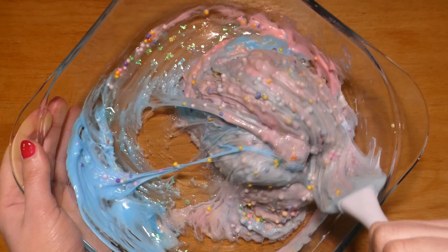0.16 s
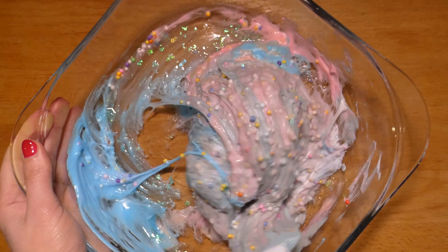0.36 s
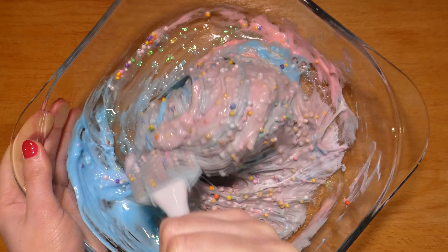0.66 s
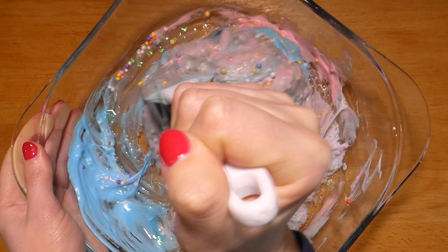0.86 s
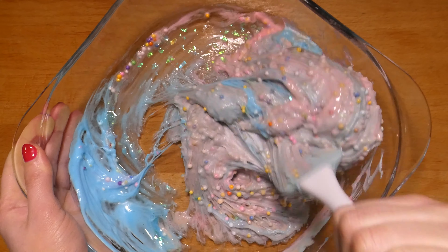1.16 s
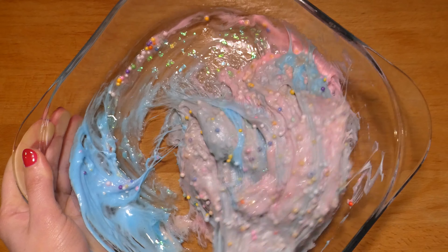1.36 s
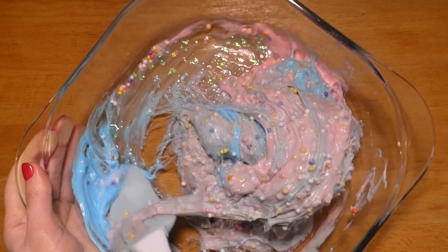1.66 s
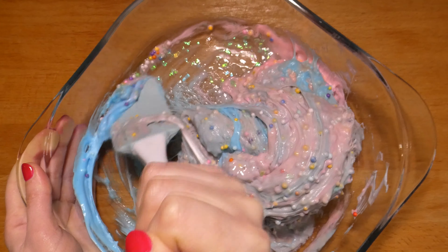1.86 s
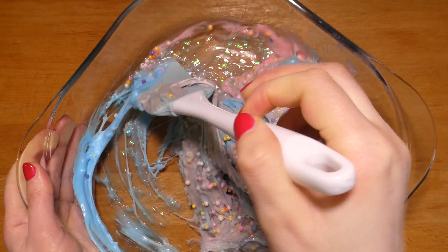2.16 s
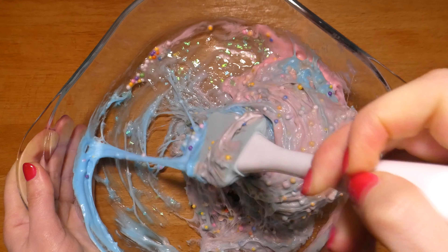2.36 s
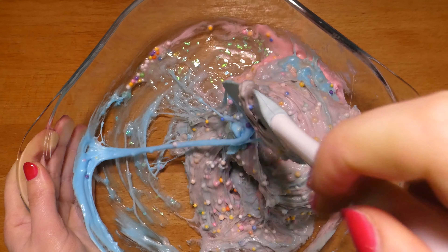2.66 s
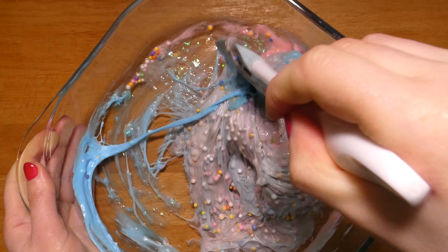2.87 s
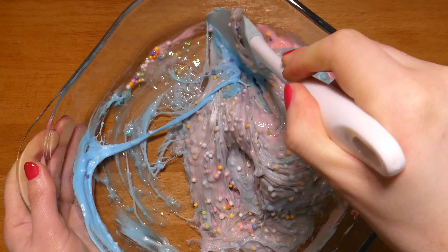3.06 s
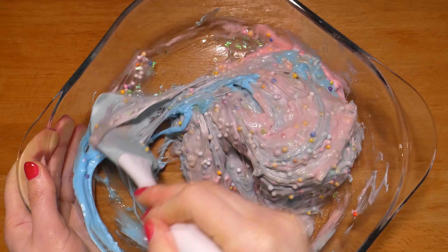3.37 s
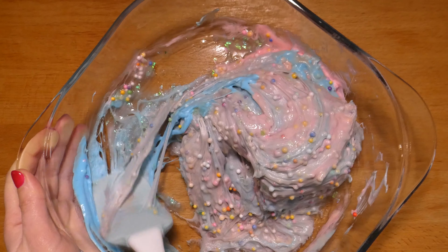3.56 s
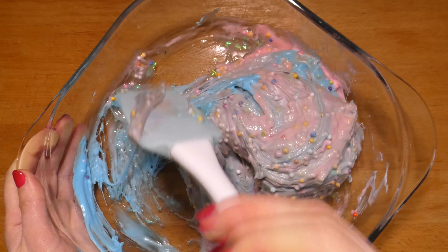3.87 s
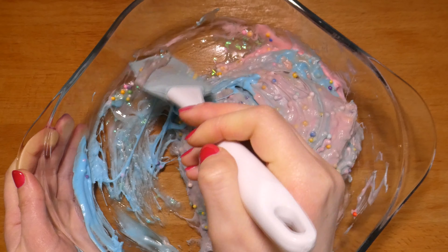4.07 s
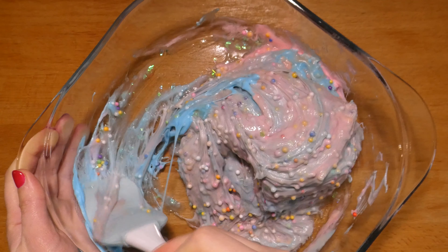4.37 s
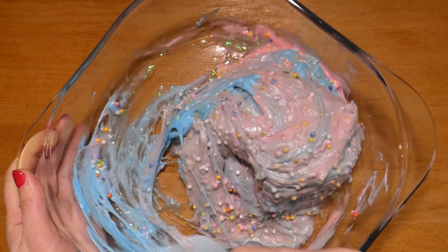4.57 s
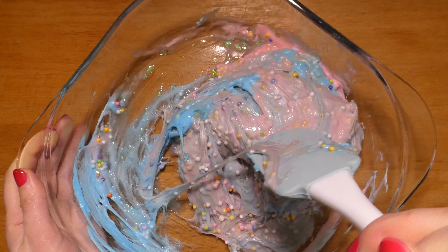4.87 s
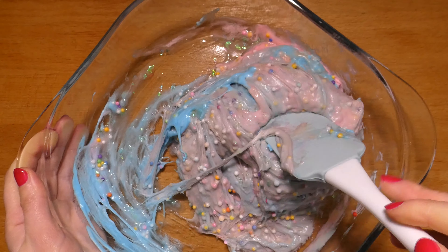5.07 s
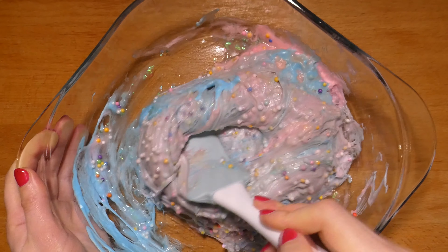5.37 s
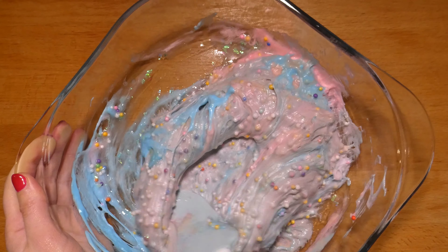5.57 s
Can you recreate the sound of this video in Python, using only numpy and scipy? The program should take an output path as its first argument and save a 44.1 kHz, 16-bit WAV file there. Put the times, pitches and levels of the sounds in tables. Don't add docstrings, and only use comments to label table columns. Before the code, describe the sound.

Sticky wet slime stirred in a glass bowl, with sharp ticks, small bubble pops and squelches, and one loud snapping pop past four seconds.

```python
import sys
import numpy as np
from scipy import signal
from scipy.fft import rfft, irfft, next_fast_len
from scipy.io import wavfile
from scipy.ndimage import uniform_filter1d, map_coordinates

SR = 44100
rng = np.random.default_rng(int(sys.argv[2]) if len(sys.argv) > 2 else 0)


def master(y):
    cut = np.clip(np.atleast_2d(y).T, -1, 1)
    pcm = np.round(cut * 32767)
    wavfile.write(sys.argv[1], SR, pcm.astype(np.int16))


def how_loud(loudness_db):
    steps = np.asarray(loudness_db, float) / 20
    return 10 ** steps


N = 252252

# t/s, peak level/dB
BIG_POCKET = (4.31744, -2.9)


def unit(x):
    return x / np.sqrt(np.mean(x ** 2) + 1e-20)


def along(points, hz):
    f, v = np.transpose(points)
    return np.interp(np.log(hz + 1), np.log(f + 1), v)


def filtered(x, response):
    m = next_fast_len(N + SR // 2)
    return irfft(rfft(x, m) * response(np.fft.rfftfreq(m, 1 / SR)), m)[..., :N]


def wobble(knots_per_s):
    knots = rng.standard_normal(int(N * knots_per_s / SR) + 4)
    return map_coordinates(knots, [np.arange(N) * knots_per_s / SR])


def rush(spectrum, patchy_db):
    z = signal.stft(rng.standard_normal(N), nperseg=256)[2]
    field = uniform_filter1d(rng.standard_normal(z.shape), 8, 0)
    field = uniform_filter1d(field, 5, 1)
    x = signal.istft(z * how_loud(patchy_db * unit(field)), nperseg=256)[1][:N]
    return unit(filtered(x, lambda hz: how_loud(along(spectrum, hz))))


def lay(s, rows):
    at = np.round(s * SR).astype(int)[:, None] + np.arange(rows.shape[1])
    return np.bincount(at.ravel(), rows.ravel(), N + rows.shape[1] + SR)[:N]


def grains(s, db, hz, cycles, size, rise=0.51):
    turns = hz[:, None] * np.arange(size) / SR
    decay = np.exp(-2 * turns / np.clip(cycles, .3, 30)[:, None])
    swell = (1 - np.exp(-(turns / rise) ** 2)) * decay
    return lay(s, how_loud(db)[:, None] * np.sin(2 * np.pi * turns) * swell / swell.max(axis=1, keepdims=True))


def ports(mid, side):
    return np.array([mid + side, mid - side])


def hum():
    # f/Hz, level/dB
    mid_spectrum = [(12, -62), (20, -18), (99, -13.5), (179, -4.5), (361, -2.5), (521, -7.5), (1390, -11.5),
                    (1560, -18), (1900, -9), (2660, -19.5), (10200, -18), (15200, -22.5), (16500, -43)]
    side_spectrum = [(12, -61), (20, -31), (53, -62), (79, -11.5), (237, 1.5), (372, 2), (428, 1),
                     (616, -2), (670, -4), (772, -3), (3140, -20), (14300, -35.5), (16500, -40)]
    return ports(how_loud(-64.0) * rush(mid_spectrum, patchy_db=1.6),
                 how_loud(-52.5) * rush(side_spectrum, patchy_db=-3.5))


def drag():
    # t at full drag/s, hold/s, drag/dB, dryness/dB, depth/dB
    strokes = [(0, 0.083, -55.5, -9, 3), (0.128, 0.14, -54, 2.5, -5.5), (0.323, 0.8, -60, 2, 3),
               (0.673, 0.1, -49.5, -2.5, -5), (0.884, 0.044, -52.5, -1, -2), (0.974, 0.15, -58.5, -3, -0.5),
               (1.125, 0.088, -60.5, -2, 5.5), (1.386, 0.01, -43.5, -1, -0.5), (1.45, 0.01, -62, -6, -6),
               (1.548, 0.055, -49, 1.5, -9), (1.662, 0.063, -51, -5, 1), (1.76, 0.26, -57, -2, -3.5),
               (2.45, 0.15, -67.5, -5, 7.5), (3.228, 0.12, -58, 3.5, -6), (3.595, 0.11, -60, 4.5, -17),
               (4.03, 0.15, -85.5, -17, 22), (4.162, 0.019, -58, -0.5, -15),
               (4.516, 0.085, -49.5, 3.5, -8.5), (4.684, 0.034, -56, -4, -3.5),
               (4.834, 0.94, -77.5, 5, 14.5), (5.245, 0.016, -65, -1, 3), (5.682, .05, -51.5, 1, 2)]
    # t/s, hold/s, drag/dB, dryness/dB, depth/dB
    slumps = [
        (2.772, 0.017, -59.5, -19, 7.5),
        (2.921, 0.026, -56.5, -2, -0.5),
        (3.355, 0.024, -45, -2.5, -5),
        (4.314, 0.035, -38, -5.5, -14),
        (1.404, 0.011, -36.5, -1, -2.5),
        (5.256, 0.29, -60, 7.5, 2),
    ]
    creep_db = [-70.5, -67.5, -67.5]
    stroke_bite_db_per_s, slump_bite_db_per_s = 170, 3000
    ease_db_per_s, tire_db_per_s = 166, 8.5

    s, hold, db, dry_db, deep_db = np.transpose(strokes + slumps)[..., None]
    bite = np.repeat([stroke_bite_db_per_s, slump_bite_db_per_s], [len(strokes), len(slumps)])[:, None]
    t = np.arange(0, N + 64, 64) / SR
    shape_db = db - bite * np.maximum(s - t, 0)
    shape_db -= ease_db_per_s * np.maximum(t - s - np.abs(hold), 0)
    shape_db -= tire_db_per_s * np.maximum(t - s, 0)
    levels = []
    for over_db, floor_db in zip([deep_db, 0, dry_db], creep_db):
        power = how_loud(2 * (shape_db + over_db)).sum(axis=0) + how_loud(2 * floor_db)
        levels.append(np.interp(np.arange(N) / SR, t, 10 * np.log10(power)))
    return levels


def crackle(level_db, count, pitch_hz, spread, cycles, scatter_db):
    s, r = rng.uniform(0, N / SR, count), rng.standard_normal(count)
    db = scatter_db * np.minimum(rng.exponential(1, count), 3.5)
    hz = np.clip(pitch_hz * np.exp(spread * r), 300, 15000)
    return how_loud(level_db) * unit(grains(s, db, hz, np.full(count, cycles), size=96))


def stirring():
    # f/Hz, density/dB
    squelch_spectrum = [(59, -62), (100, -33), (227, -5), (382, -9.5), (416, -4), (610, -12), (1200, -13.5),
                        (1560, -44), (2640, -120)]
    smear_spectrum = [(350, -50), (600, -6.5), (656, -10.5), (1170, -7), (1690, -2), (2040, -5),
                      (2310, -3.5), (2590, -6.5), (5000, -9.5), (6500, -11.5), (11000, -120)]
    tear_spectrum = [(1650, -53), (2800, 12.5), (3450, 0.5), (3970, -21), (4310, 6.5), (9810, 14.5),
                     (12800, 9), (14900, 10.5), (16000, -9), (16500, -54)]
    low_db, mid_db, high_db = drag()
    slip = .6 * wobble(30) + .6 * wobble(90) + .7 * wobble(260)
    body = how_loud(low_db - 2.5 + 0.7 * slip) * rush(squelch_spectrum, patchy_db=2.0)
    smear = how_loud(mid_db - 1.5 + 2.3 * slip) * rush(smear_spectrum, patchy_db=1.5)
    tear = how_loud(high_db - 2.5 + 2.3 * slip) * rush(tear_spectrum, patchy_db=1.5)
    wet = crackle(mid_db - 20.0, count=900, pitch_hz=1780, spread=1.0, cycles=2.4, scatter_db=0.0)
    fizz = crackle(high_db - 6, count=4000, pitch_hz=8000, spread=.4, cycles=2.2, scatter_db=3.1)
    return body + smear + tear + wet + fizz


def ticks():
    # t/s, peak level/dB
    film_rows = [(.2697, -30), (.3245, -29), (.3598, -34), (.389, -36), (.4104, -36), (.9043, -21.5),
                 (.9194, -29), (1.0146, -31.5), (1.2802, -27.5), (1.299, -21.5), (1.4222, -19),
                 (1.494, -25), (1.8823, -35), (1.9034, -36), (3.1766, -21.5), (3.3493, -25.5), (3.379, -30),
                 (3.6215, -36.5), (4.036, -38), (4.2692, -32.5), (4.8397, -39), (4.8913, -34.5),
                 (5.1454, -40), (5.1941, -38), (5.2455, -36), (5.258, -27), (5.4056, -40), (5.509, -22)]
    # t/s, peak level/dB, f/Hz
    thread_rows = [(0.402, -28, 9200), (.416, -35, 9100), (0.4475, -28, 8800), (0.501, -32.5, 9300),
                   (0.6654, -40, 6460), (0.8932, -25, 7200), (1.0592, -27.5, 8600), (1.1446, -27, 6240),
                   (1.2934, -31, 8600), (1.372, -30, 6800), (1.465, -22.5, 6000), (2.045, -35, 7350),
                   (3.225, -37.5, 8850), (4.2292, -39, 6850), (4.4464, -27, 11300), (.875, -38, 12900),
                   (1.222, -37.5, 10900), (3.166, -43, 11500), (2.955, -39, 9000), (4.579, -28.5, 7700),
                   (4.6069, -27.5, 7500), (4.796, -35, 9400), (5.478, -41, 9000), (5.5238, -32, 9300),
                   (5.558, -36, 11500), (5.578, -41, 11100), (5.653, -30.5, 8400), (5.657, -32, 7600),
                   (5.6975, -26, 7360), (5.609, -44, 7000), (5.6662, -23, 11100), (5.707, -22, 11000)]
    # t/s, peak level/dB, f/Hz
    strand_rows = [(.054, -38, 4840), (.1296, -35, 4600), (0.1703, -37, 4250), (.297, -35, 4730),
                   (0.6048, -36, 5450), (0.6576, -28.5, 5100), (0.6855, -24.5, 5200), (.693, -33, 4700),
                   (.708, -30.5, 4120), (.8154, -37.5, 4050), (1.3557, -32, 5400), (1.382, -26, 5450),
                   (1.403, -31, 6200), (1.4572, -25, 5240), (1.716, -33.5, 5030), (2.773, -32.5, 3650),
                   (3.0586, -38.5, 5700), (3.3786, -33, 3620), (3.6107, -39.5, 4300), (3.9245, -36, 5770),
                   (4.3423, -28, 4470), (4.67, -43, 5600), (4.711, -41, 3920), (5.388, -36, 5360),
                   (5.6221, -37.5, 5850), (5.6665, -32, 5850), (5.6753, -44, 5230), (5.6795, -12.5, 6300)]
    film_hz, film_spread = 10140, 0.012
    sizzle_db, sizzle_s = -12, 0.0017

    pitches_hz = film_hz * np.exp(film_spread * rng.standard_normal(len(film_rows)))
    s, db, hz = np.vstack([np.c_[film_rows, pitches_hz], thread_rows, strand_rows]).T
    cycles = np.full(len(s), 2.4)
    snap = grains(s + .0006, db - 0.4, hz, cycles, size=96, rise=1.8)
    echo = grains(s + 0.000803, db - 7.0, 0.54 * hz, cycles, size=96, rise=0.11)
    overtone = grains(s + 0.00022, db - 3.5, 1.42 * hz, cycles, size=96)

    t = np.arange(700) / SR
    hiss = uniform_filter1d(rng.standard_normal((len(s), len(t))), size=5, axis=1)
    hiss = unit(hiss * np.sin(2 * np.pi * hz[:, None] * t))
    sizzle = lay(s + 0.00095, how_loud(db + sizzle_db)[:, None] * hiss * np.exp(-t / sizzle_s))
    return snap + sizzle + echo + overtone


def pops():
    # t/s, peak level/dB, f/Hz
    pocket_rows = [(.054, -39, 775), (0.113, -36, 1370), (0.506, -38, 1240), (0.613, -35, 1030),
                   (0.685, -24.5, 1420), (.701, -30, 980), (.743, -29, 990), (.75, -35, 1040),
                   (0.845, -35, 1140), (0.892, -32, 923), (1.022, -43, 1010), (1.279, -42, 870),
                   (1.298, -41, 1500), (1.3822, -25.5, 1510), (1.403, -31, 765), (1.423, -43, 736),
                   (1.481, -28.5, 1500), (1.835, -39, 1080), (2.771, -35, 780), (3.283, -37, 1130),
                   (3.357, -23.5, 1260), (4.561, -26, 1560), (5.615, -39.5, 1000), (5.642, -39, 990),
                   (5.708, -32.5, 950), (5.485, -42.5, 1070),
                   (0.055, -30.5, 2770), (.181, -35, 1880), (.298, -35, 1840), (.654, -33, 1730),
                  (1.126, -35, 1780), (1.362, -26, 2210), (1.56, -40, 1730), (2.933, -30, 2290),
                  (3.178, -37.5, 1810), (3.264, -36, 1880), (3.924, -47, 2150), (4.229, -35, 2660),
                  (4.314, -39, 1960), (2.7704, -32.5, 1640), (4.687, -38, 2800), (4.53, -33, 2200),
                  (5.257, -32.5, 2100), (5.278, -46, 2300), (5.31, -39, 2300), (5.388, -32.5, 2180),
                  (5.437, -49, 2500), (1.318, -42, 1780), (1.424, -32, 1750), (1.411, -36, 2300),
                  (5.41, -36, 2470), (5.509, -25, 2460), (5.565, -38, 1780), (5.631, -36, 2250),
                  (5.658, -32, 2410), (5.679, -21, 1970), (5.7073, -18.5, 2590)]
    s, db, hz = np.transpose(pocket_rows)
    cycles = np.full(len(s), 2.76)
    crack = grains(s + 0.00041, db - 4.0, 3.55 * hz, cycles / 2, size=96)
    return grains(s + 0.00039, db + 0.2, hz, cycles, size=700) + crack


def clicks():
    # t/s, peak level/dB, f/Hz
    blister_rows = [(0.6296, -43, 1300), (0.6331, -45, 950), (0.6588, -54, 597), (0.6946, -36, 935),
                    (0.8761, -42, 1040), (0.9812, -41.5, 1020), (0.9873, -44.5, 1000),
                    (1.0979, -43.5, 1150), (1.1265, -66, 600), (2.0477, -48.5, 1090), (3.3622, -30, 1320),
                    (4.5634, -52, 1350), (5.1327, -53, 830), (5.5101, -39, 960)]
    # t/s, peak level/dB, f/Hz
    bead_rows = [(0.0554, -39, 2880), (0.131, -40, 1950), (0.2011, -37, 2650), (0.2605, -43, 1870),
                 (0.3376, -45, 1580), (0.5729, -55, 1680), (0.6286, -39, 1390), (0.7101, -36, 2720),
                 (1.067, -40, 2050), (1.3565, -31, 2400), (1.4048, -37, 1590), (1.4955, -32.5, 2530),
                 (1.5605, -35.5, 1850), (2.6714, -54, 2330), (2.9776, -46, 1620), (3.028, -48, 1920),
                 (3.1746, -47, 1720), (3.1786, -56, 1800), (3.2823, -43, 1720), (3.3619, -37, 1580),
                 (3.3831, -38, 1440), (3.7171, -49, 1960), (4.2704, -45, 2830), (4.3748, -33, 1900),
                 (4.4531, -36, 1660), (4.486, -38, 2130), (4.5272, -40, 2230), (4.6433, -42, 2210),
                 (5.3325, -47, 2330), (5.5266, -41, 2240), (5.6236, -47, 2820), (5.6425, -42, 2430)]
    # t/s, peak level/dB, f/Hz
    nip_rows = [(0.2495, -29.5, 5850), (0.3233, -45, 5340), (0.4026, -37, 5900), (0.48, -38, 6090),
                (0.5056, -37, 5600), (0.5125, -36, 6090), (0.5729, -42, 4830), (0.6139, -34, 5960),
                (0.6286, -39, 5150), (0.9201, -35, 6550), (1.068, -38, 4500), (1.2224, -45, 4370),
                (1.3565, -37, 5730), (1.3624, -32, 3960), (1.658, -41, 5300), (1.942, -42, 3720),
                (3.2273, -40, 4920), (3.3608, -43, 4370), (3.6115, -48, 4390), (3.7979, -48, 5000),
                (4.6724, -41, 5660), (5.2342, -51, 6120), (5.2577, -32, 4150), (5.4093, -38, 5730),
                (5.6422, -47, 4090), (5.71, -29, 3790)]
    # t/s, peak level/dB, f/Hz
    pinhole_rows = [(0.0789, -39, 10530), (0.1311, -33, 9860), (0.2498, -29, 12250), (0.2985, -33, 10420),
                    (0.3677, -29.5, 9780), (0.4803, -37, 8720), (0.5082, -34, 8050), (0.6584, -28, 9700),
                    (0.8749, -41, 14990), (1.3194, -30, 10310), (1.3336, -35, 7450), (2.9336, -44, 9370),
                    (3.0688, -42, 13500), (3.1466, -47, 9910), (3.1667, -40, 10300), (3.1752, -44, 13930),
                    (3.2578, -32, 9500), (3.2651, -33.5, 9320), (3.3619, -27, 11390), (3.3832, -31, 10120),
                    (3.4427, -35, 9350), (3.8869, -41, 7900), (3.9252, -45, 7360), (4.2294, -37, 7670),
                    (4.9579, -40, 10400), (4.115, -56, 9000), (3.3425, -38, 9500), (1.212, -42, 10400),
                    (3.391, -41, 8000), (5.632, -43, 6940), (4.29, -36, 8500), (4.295, -44, 7500),
                    (4.401, -40, 9000), (5.023, -40, 10500), (5.111, -44, 9500), (5.279, -41, 11500),
                    (4.722, -40, 7500), (5.1474, -43, 9370), (5.2342, -46, 10250), (5.4093, -31, 12490),
                    (5.6618, -32, 8070), (5.6759, -27, 7450)]
    kinds = [(blister_rows, 1.5, 2.6), (bead_rows, 2.5, 1.9), (nip_rows, 2.5, 2.1), (pinhole_rows, 3, 2.4)]
    out = np.zeros(N)
    for rows, gain_db, cycles in kinds:
        s, db, hz = np.transpose(rows)
        out += grains(s - 0.75 / hz, db + gain_db, hz, np.full(len(s), cycles), size=500, rise=0.94)
    return out


def knocks():
    # t/s, peak level/dB, f/Hz, decay/cycles
    knock_rows = [(0.132, -40, 357, 1.1), (0.16, -42.5, 218, 2.2), (0.658, -43.5, 506, 7.8),
                  (0.738, -52.5, 428, 6.5), (1.128, -46.5, 452, 13.5), (1.129, -53, 307, 6.9),
                  (1.377, -43.5, 492, 9.9), (1.422, -33, 564, 3.9), (2.769, -55, 650, 13),
                  (3.355, -40, 232, 2.2), (3.546, -42, 258, 4.5), (4.3172, -36.5, 388, 1.7),
                  (4.561, -51, 597, 8), (5.304, -51.5, 355, 4.1), (5.508, -46.5, 328, 2.4),
                  (5.691, -49.5, 463, 19), (5.679, -55, 323, 6.4), (4.962, -56.5, 400, 2),
                  (5.018, -62, 420, 4.8), (5.219, -58, 450, 3.5), (5.258, -57, 330, 4),
                  (5.387, -55.5, 348, 3.6), (4.563, -53, 307, 6.5), (4.034, -55, 205, 2.8)]
    s, db, hz, cycles = np.transpose(knock_rows)
    overtone = grains(s, db - 14.5, 2.17 * hz, cycles, size=2000, rise=8.3)
    return grains(s, db + 7.0, hz, cycles, size=2000) + overtone


def gurgles():
    # t/s, level/dB, f/Hz, length/s
    gurgle_rows = [(0.137, -49, 442, 0.0079), (0.69, -41, 1230, 0.0022), (0.744, -43, 910, 0.0043),
                   (0.699, -32.5, 1380, 0.001), (0.709, -44.5, 900, 0.0068), (0.902, -38.5, 965, 0.0059),
                   (0.903, -46, 1274, 0.005), (4.59, -41, 3470, 0.002), (4.71, -48, 3930, 0.0013),
                   (4.546, -41, 2297, 0.004), (1.391, -45, 1423, 0.019), (1.404, -42, 760, 0.012),
                   (1.421, -36, 674, 0.005), (1.422, -32, 1360, 0.0024), (1.432, -51, 1280, 0.0048),
                   (3.357, -35.5, 1430, 0.0048), (3.548, -41, 560, 0.0039)]
    s, db, hz, length_s = np.transpose(gurgle_rows)
    t = np.arange(3000) / SR
    flutter = uniform_filter1d(rng.standard_normal((len(s), len(t))), size=110, axis=1)
    tone = how_loud(4.1 * unit(flutter)) * np.sin(2 * np.pi * hz[:, None] * t)
    age = t / np.clip(length_s, .001, .008)[:, None]
    return lay(s, how_loud(db)[:, None] * tone * age * np.exp(1 - age))


def squeaks():
    # [t/s, f/Hz, level/dB]
    squeak_rows = [
        (40, [(2.45, 2350, -75), (2.55, 2330, -63.5), (2.62, 2290, -70)]),
        (60, [(2.46, 1310, -68), (2.57, 1290, -71)]),
        (370, [(4.325, 1740, -47), (4.39, 1770, -49), (4.46, 1885, -52), (4.52, 2080, -53), (4.6, 2310, -59)]),
        (90, [(4.51, 2244, -60), (4.53, 2297, -53), (4.56, 2336, -58), (4.6, 2330, -62)]),
        (300, [(5.26, 2400, -68), (5.36, 2490, -78), (5.45, 2520, -60), (5.55, 2420, -86), (5.7, 2430, -60)]),
        (200, [(4.75, 1810, -67.5), (5.1, 1780, -75), (5.45, 1772, -67), (5.6, 1784, -67), (5.71, 1700, -48)]),
        (450, [(3.36, 1440, -36), (3.4, 1446, -67), (3.47, 1500, -71)]),
        (1100, [(4.325, 4300, -59), (4.39, 4300, -50), (4.47, 4020, -59), (4.62, 3400, -64)]),
    ]
    t, out = np.arange(N) / SR, np.zeros(N)
    for width_hz, rows in squeak_rows:
        s, hz, db = np.transpose(rows)
        phase = 2 * np.pi * np.cumsum(np.interp(t, s, hz)) / SR
        flutter = filtered(rng.standard_normal((2, N)), lambda f: np.exp(-(f / width_hz) ** 2))
        whistle = unit(flutter[0] * np.sin(phase) + flutter[1] * np.cos(phase))
        out += how_loud(np.interp(t, s, db, -140, -140)) * whistle
    return out


def taps():
    # t/s, peak level/dB
    tap_rows = [
        (3.358, -38),
        (3.36, -56),
        (3.549, -43),
        (3.577, -53.5),
        (4.561, -48),
    ]
    # f/Hz, level/dB, t60/s
    glass_modes = [(420, -7.5, 0.086), (661, 2, 0.032), (900, -13, 0.028), (1180, -28, .06),
                   (1440, -1.5, 0.12)]
    s, db = np.transpose(tap_rows)
    t = np.arange(6000) / SR
    ring = sum(how_loud(g - 60 * t / t60) * np.sin(2 * np.pi * hz * t) for hz, g, t60 in glass_modes)
    ring = ring * (1 - np.exp(-t / 0.0006))
    return lay(s, how_loud(db)[:, None] * ring)


def burst():
    # f/Hz, width/Hz, level/dB
    cavity_modes = [(1250, 350, -13), (1870, 310, 0), (2380, 300, -11), (2850, 520, -7), (4100, 370, -5),
                    (5400, 450, -14), (7270, 900, -18), (9090, 900, -13), (11400, 800, -19),
                    (13200, 900, -20), (14800, 700, -24)]
    t = np.arange(300) / SR
    ring = sum(how_loud(db) * w * np.cos(2 * np.pi * c * t) * np.exp(-1.2 * w * t) for c, w, db in cavity_modes)
    opening = (np.exp(-(t / .00068) ** 5) - 1) / (1 + (t / .0035) ** 6)
    push = ring * opening
    return lay(np.array([BIG_POCKET[0]]), how_loud(BIG_POCKET[1]) * (push / np.abs(push).max())[None])


def blast():
    db, hz = BIG_POCKET[1] + np.array([-4, -3, -9]), np.array([1750, 4300, 8500])
    return grains(np.full(3, BIG_POCKET[0]), db, hz, np.array([1.8, 1.6, 2.2]), size=300)


def bowl(x):
    wall_echoes = [(.0011, -22), (.0024, -21.5)]
    return filtered(x, lambda f: 1 + sum(how_loud(db) * np.exp(-2j * np.pi * f * s) for s, db in wall_echoes))


def room(x):
    # f/Hz, t60/s
    decay_s = [(200, 0.67), (2000, 0.46), (5500, 0.34), (7500, 0.088), (14000, 0.024)]
    # f/Hz, level/dB
    side_db = [(200, 3), (1500, -1), (5000, -3), (15000, -51)]
    hz, t, z = signal.stft(rng.standard_normal((2, SR // 2)), SR, nperseg=256)
    gather = 1 - np.exp(-t / .014)
    shape = gather * how_loud(-60 * t / along(decay_s, hz)[:, None])
    tail = signal.istft(z * shape, SR, nperseg=256)[1]
    mid, side = signal.fftconvolve(x[None], tail / np.linalg.norm(tail[0]), axes=1)[:, :N]
    return ports(mid, filtered(side, lambda f: how_loud(along(side_db, f))))


def scene():
    # f/Hz, level/dB
    edge_db = [(3000, -19), (8000, -18.5), (13000, -11)]
    snaps = ticks() + pops() + clicks()
    mass = knocks() + stirring() + squeaks() + gurgles() + taps()
    near = bowl(snaps) * how_loud(-2.0) + mass + burst()
    side = filtered(near, lambda f: how_loud(along(edge_db, f)) * np.exp(-2j * np.pi * f * 0.00041))
    shaded = how_loud(-18) * (snaps + mass)
    direct = ports(near, side) * how_loud([[.2], [-.2]])
    heard = direct + room(shaded + how_loud(-14.5) * blast())
    return filtered(heard, lambda f: (1j * f / (130 + 1j * f)) ** 3) + hum()


def top_cut(x):
    return signal.sosfilt(signal.butter(12, 16800, fs=SR, output="sos"), x)


def record(dry):
    band_edge = [(15600, -1.0), (15950, -18), (16780, -22), (16900, -94)]  # f/Hz, level/dB
    mix = filtered(dry, lambda f: how_loud(along(band_edge, f)))
    return top_cut(mix)


dry = scene()
out = record(dry)
master(out)
```